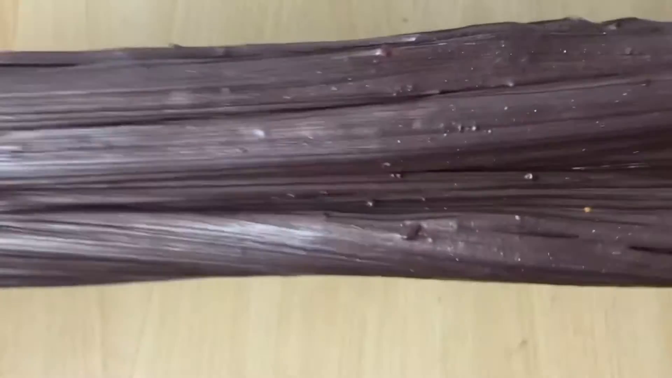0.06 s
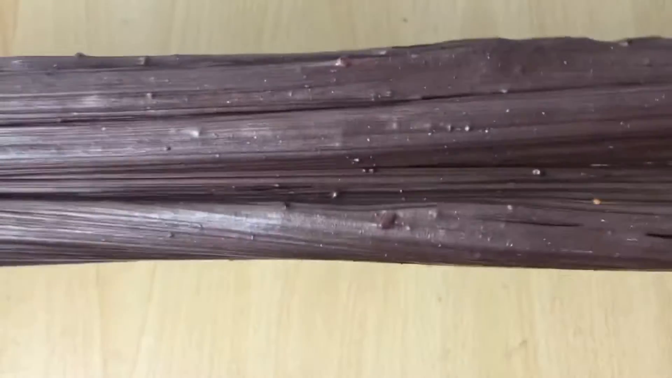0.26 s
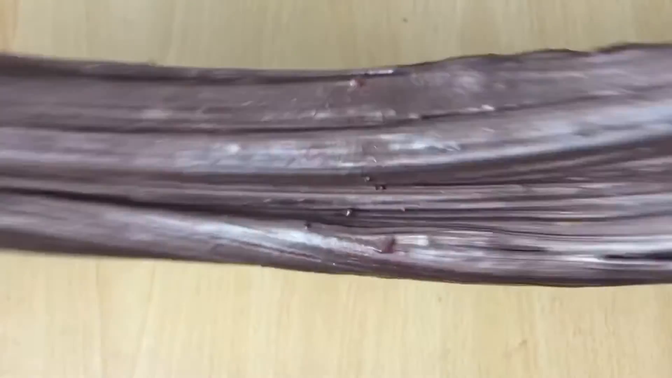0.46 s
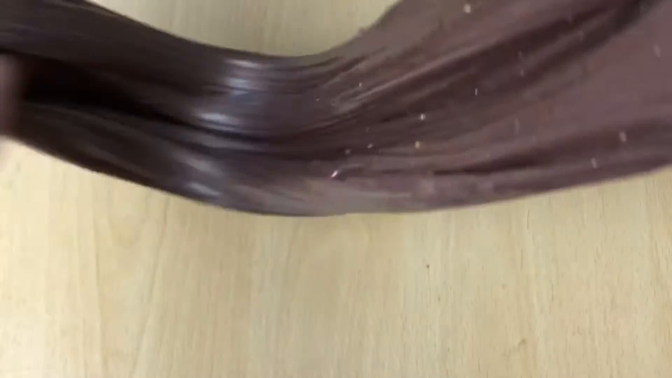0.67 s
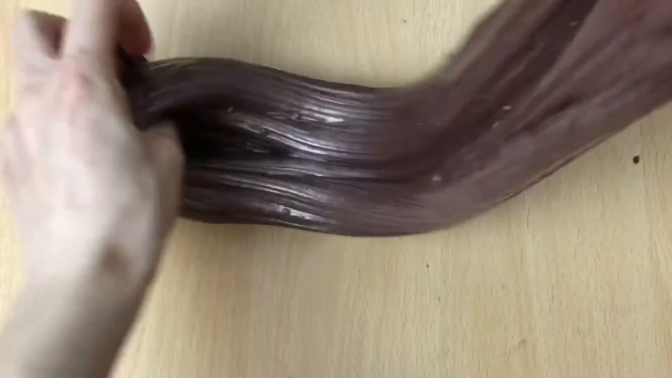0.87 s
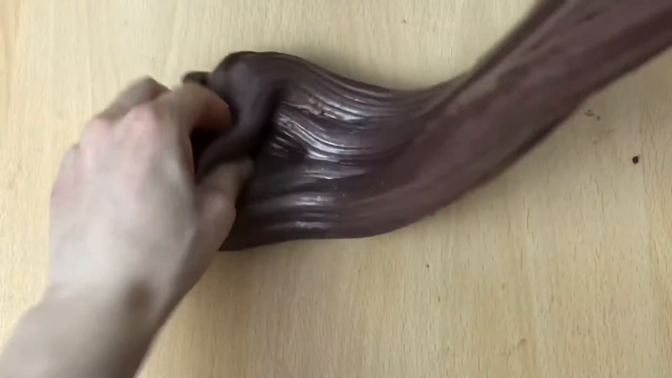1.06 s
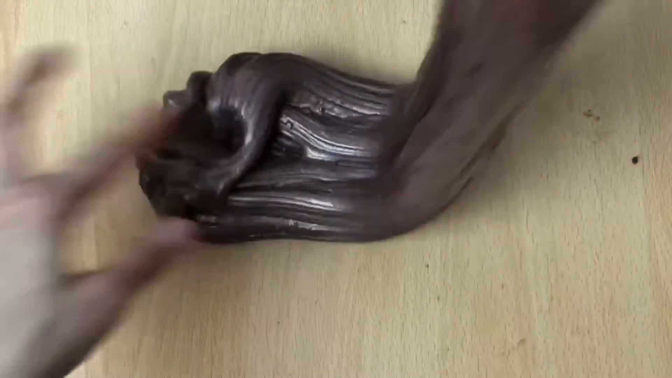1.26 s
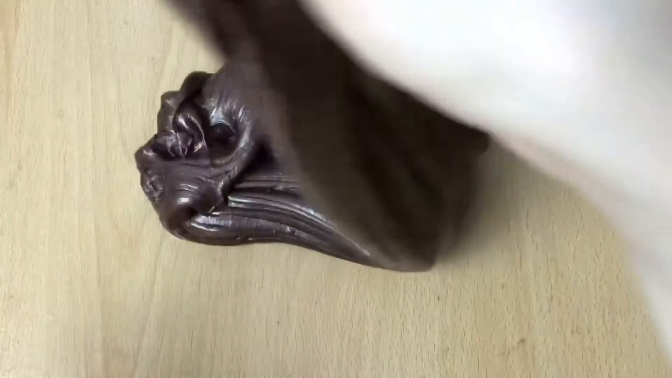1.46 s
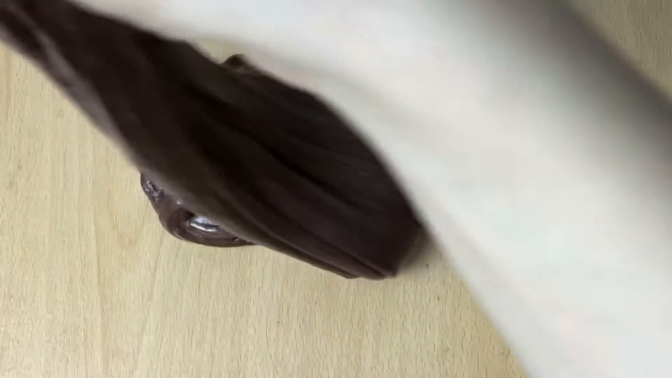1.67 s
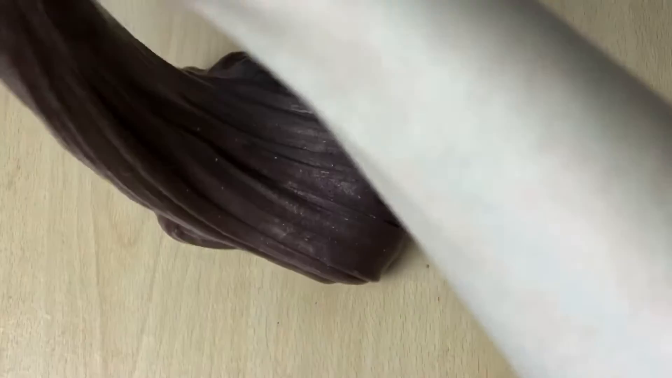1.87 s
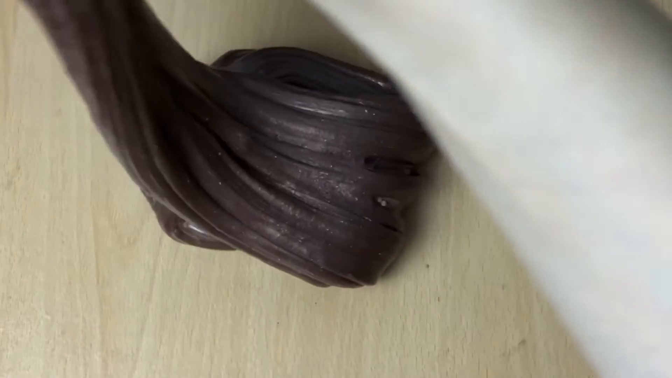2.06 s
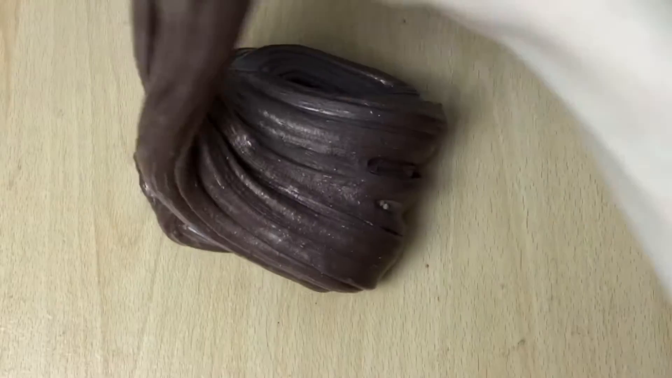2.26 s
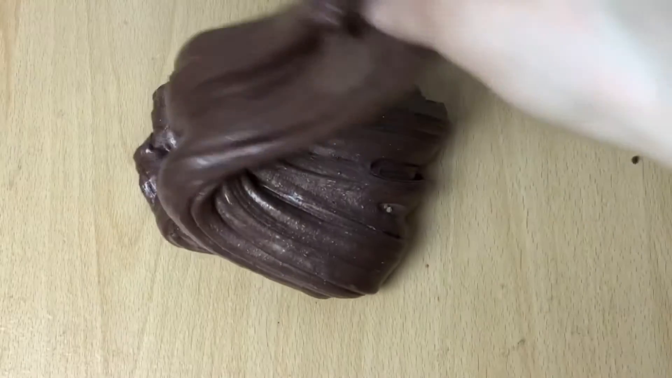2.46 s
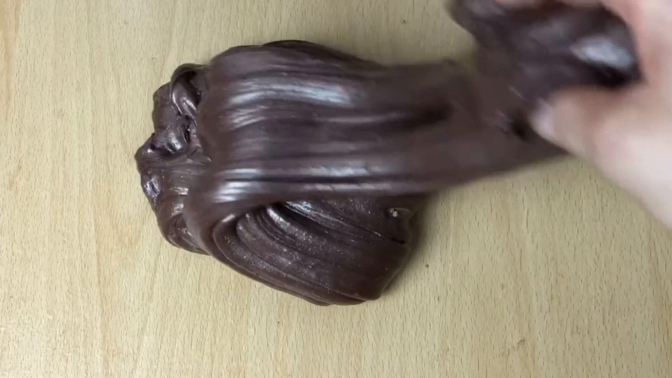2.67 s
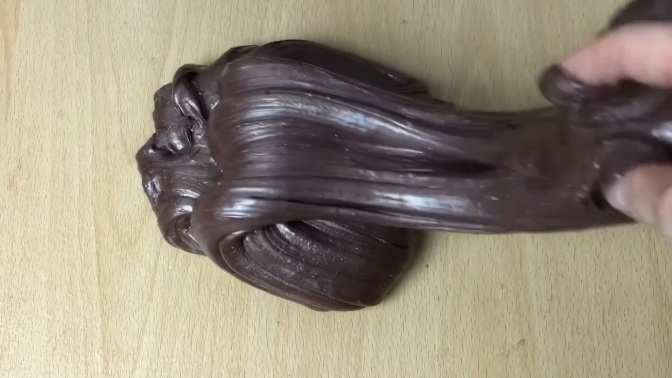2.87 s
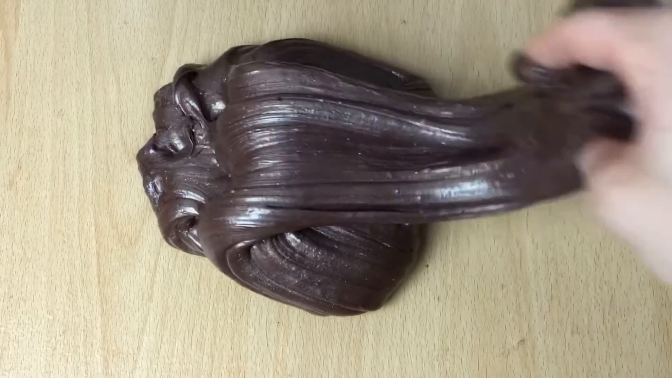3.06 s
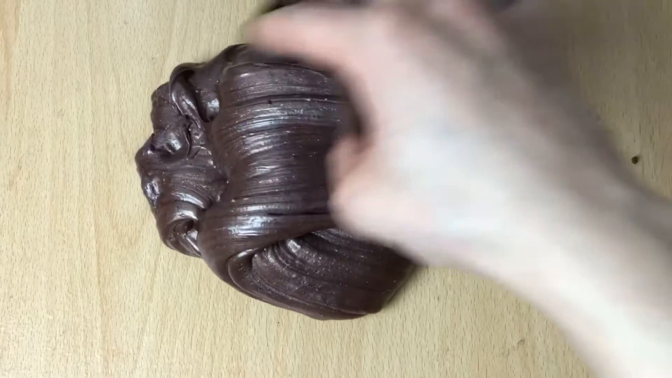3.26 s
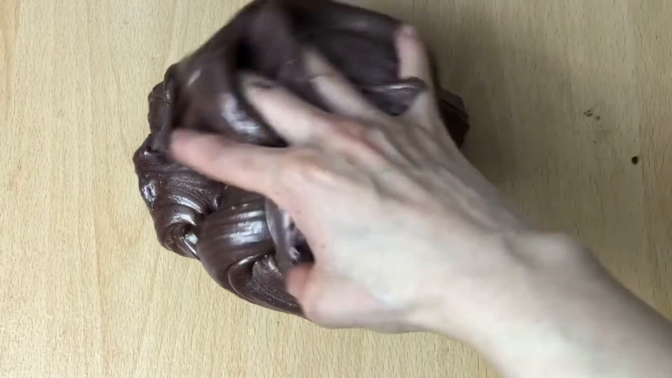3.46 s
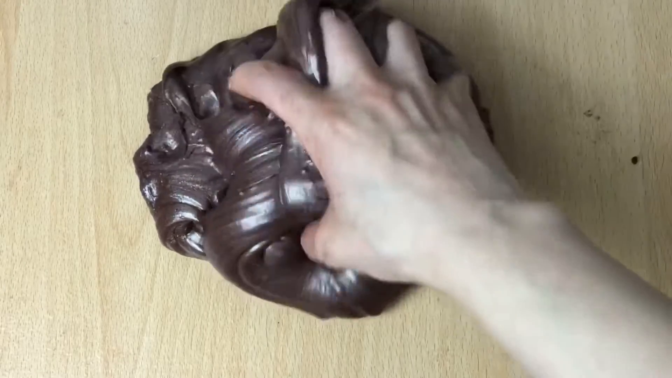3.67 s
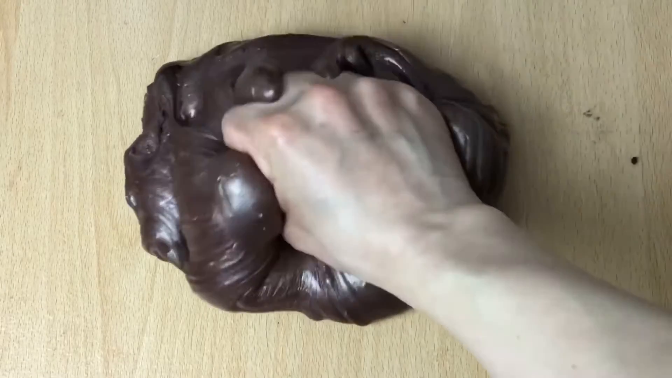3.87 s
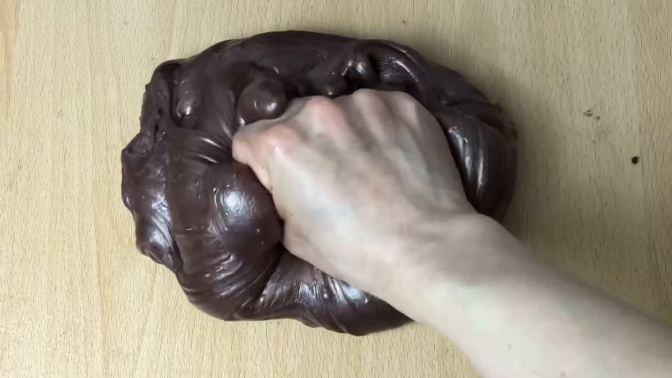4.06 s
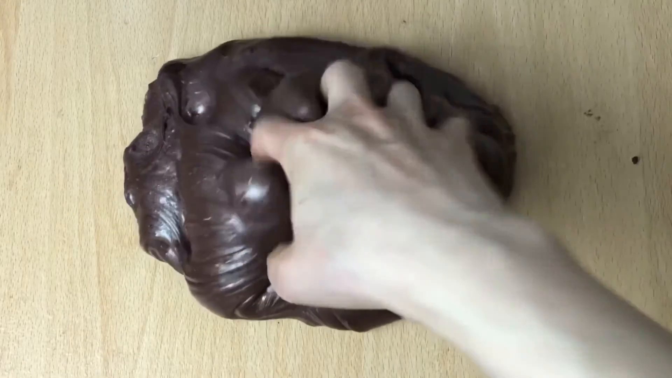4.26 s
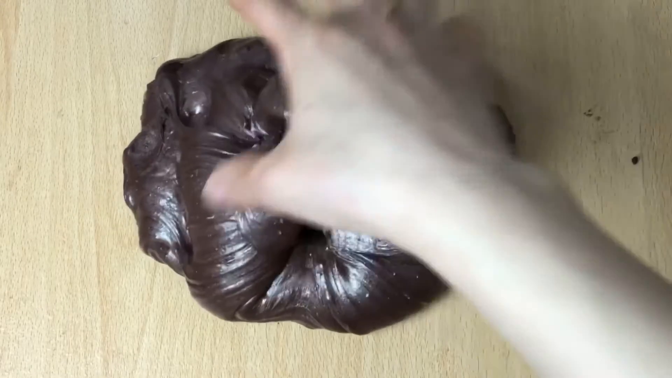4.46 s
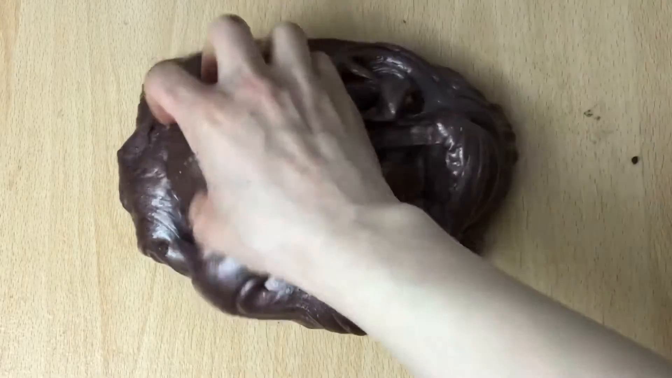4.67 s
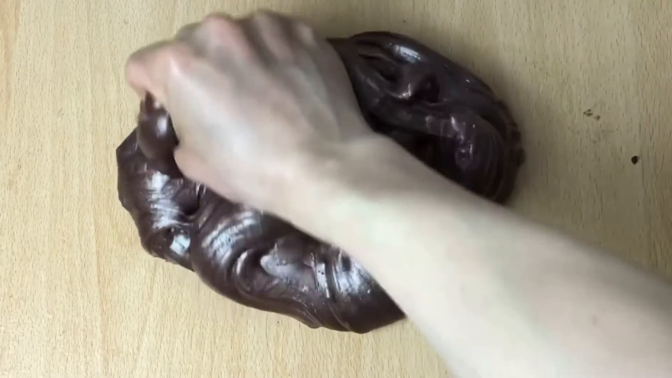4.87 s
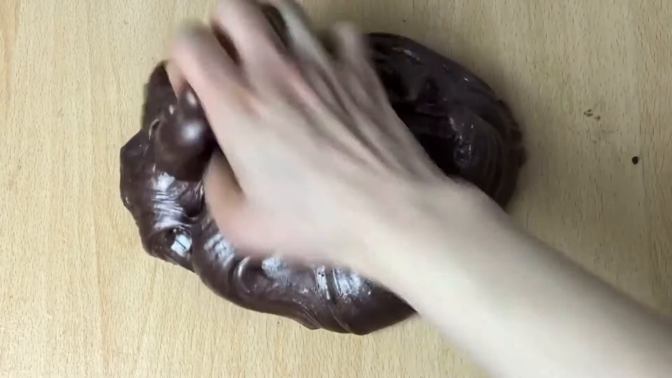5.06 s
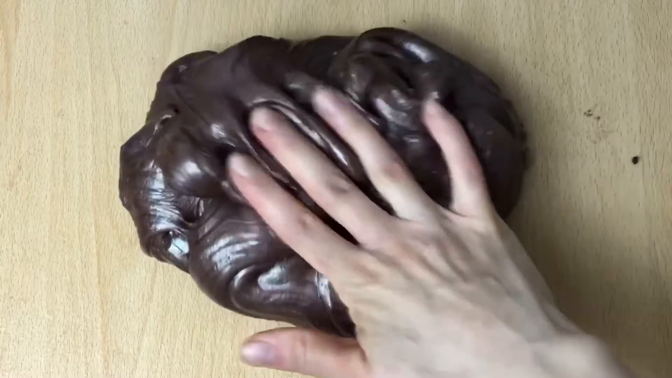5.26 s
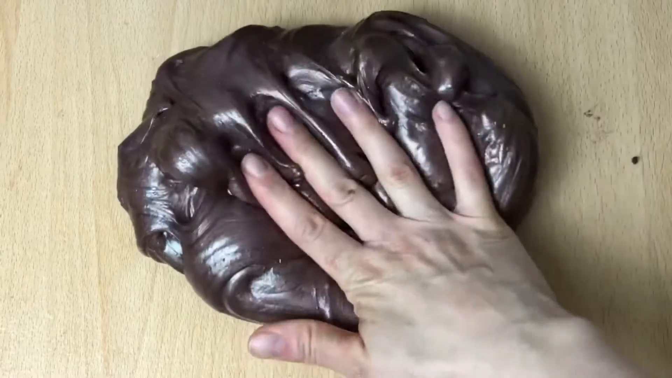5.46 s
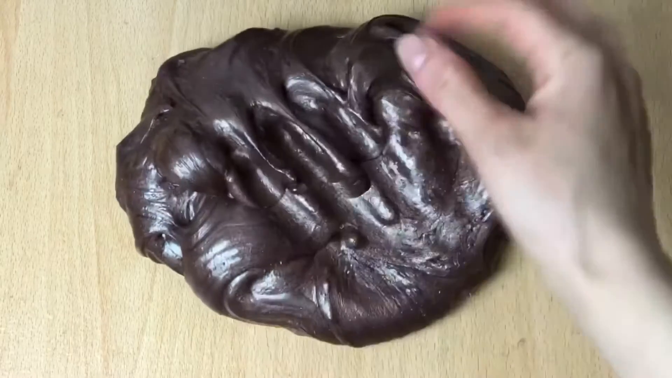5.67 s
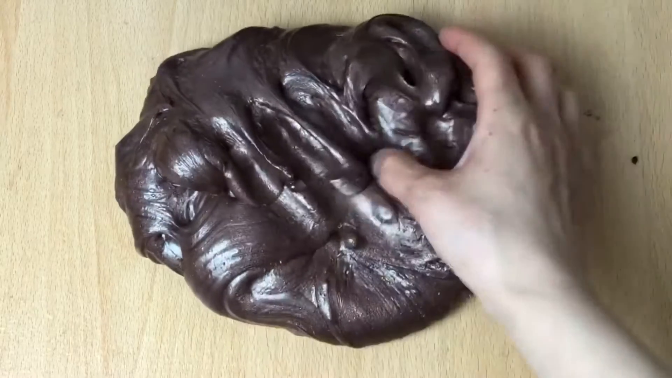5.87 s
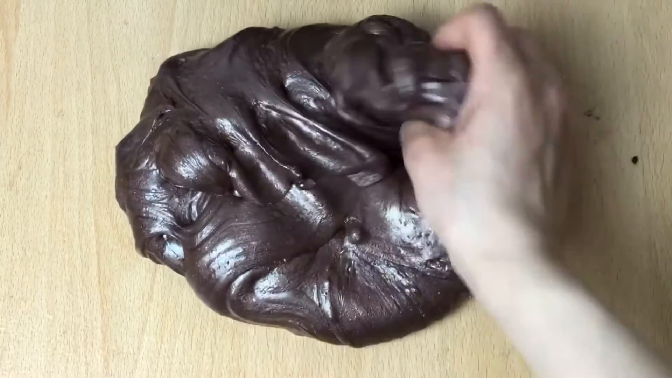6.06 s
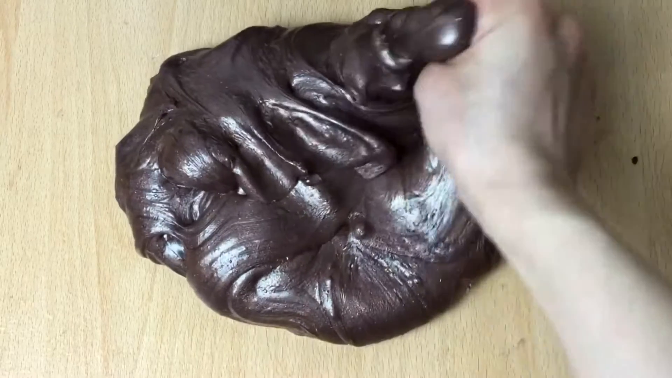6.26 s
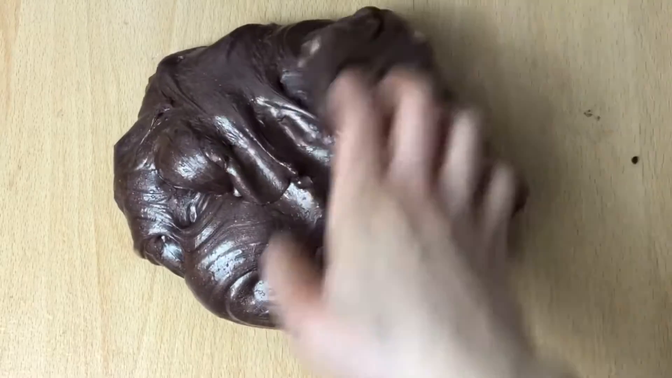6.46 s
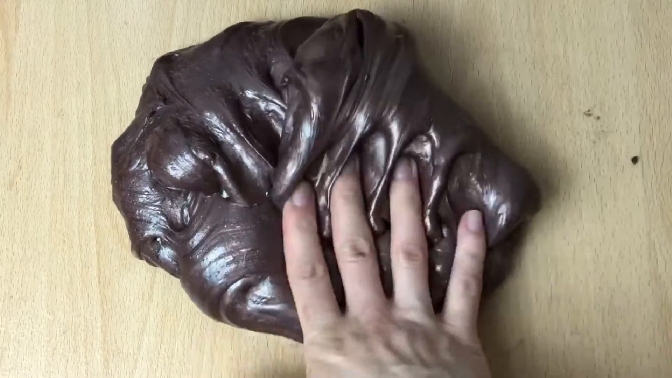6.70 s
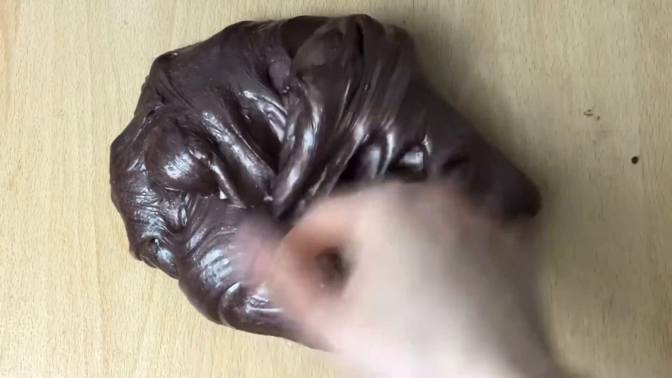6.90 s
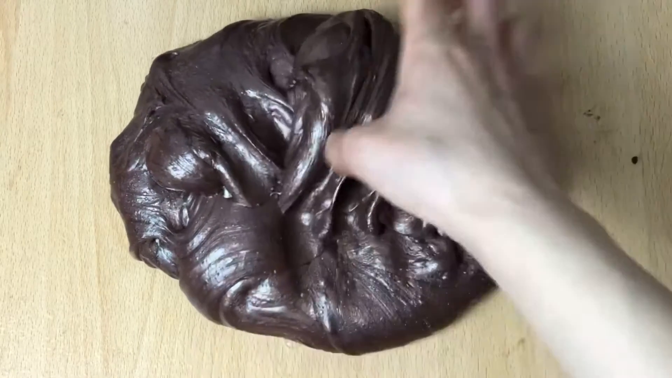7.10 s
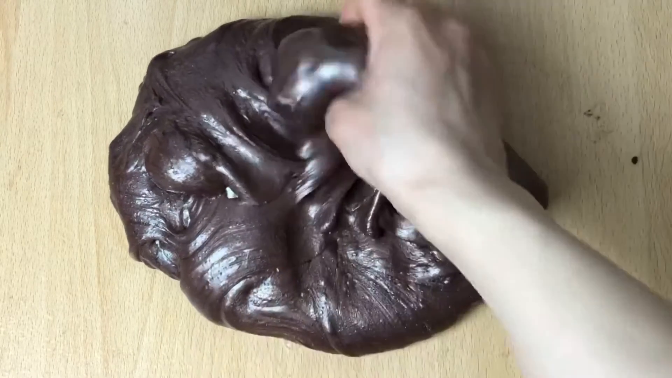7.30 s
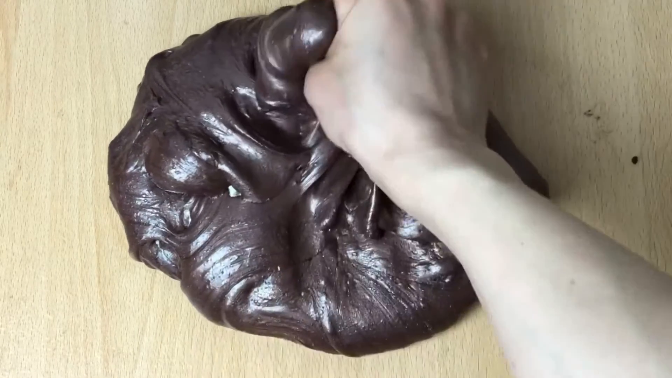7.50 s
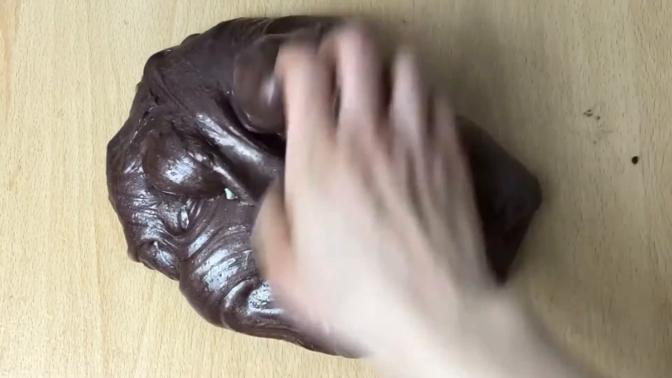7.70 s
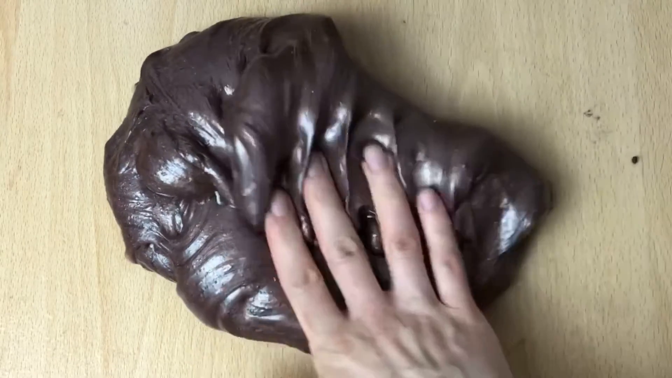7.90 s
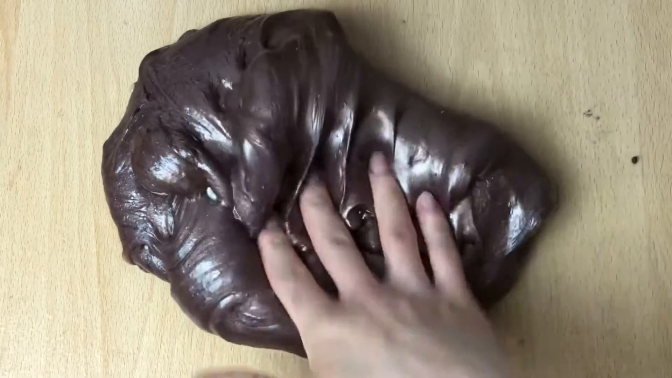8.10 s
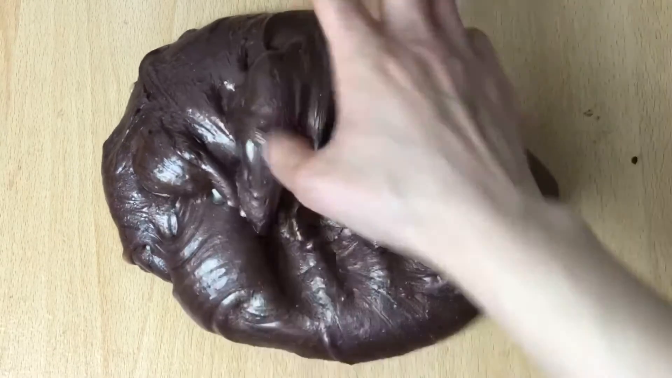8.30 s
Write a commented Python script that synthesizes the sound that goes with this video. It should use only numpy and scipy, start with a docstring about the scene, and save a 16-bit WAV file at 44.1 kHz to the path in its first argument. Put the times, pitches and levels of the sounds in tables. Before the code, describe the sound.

Quiet sticky peeling gives way to heavy squelchy presses and loud, clicking bubble pops as slime is worked on a tabletop.

```python
"""In a small room, thick slime is stretched, folded and kneaded by hand on a wooden table, close to the microphone.
Sticky films tear in a crackle of tiny dying chirps; trapped bubbles snap as filtered noise bursts.
Air squirts through wet folds as resonant flutters; pockets collapse in soft, heavily damped plops.
Low noise thuds and rumbles as the hand works, over still air, microphone hiss and a faint hum."""
import sys
import numpy as np
from scipy import signal
from scipy.fft import rfft, irfft, next_fast_len
from scipy.io import wavfile
from scipy.ndimage import uniform_filter1d

SR = 44100
rng = np.random.default_rng(int(sys.argv[2]) if len(sys.argv) > 2 else 0)


def master(y):
    """Save y as 16-bit WAV."""
    cut = np.clip(np.atleast_2d(y).T, -1, 1)
    pcm = np.round(cut * 32767)  # scale
    wavfile.write(sys.argv[1], SR, pcm.astype(np.int16))


N = 367794
TIME = np.arange(N) / SR

# Still air and microphone hiss, relative spectrum: [f/Hz, level/dB]
AIR_COLOUR = [(18, -29.5), (30, 6.5), (86, -3.5), (141, 0.5), (331, -14), (675, -20), (821, -23),
              (1510, -25), (4140, -29.5), (5980, -26), (9060, -28.5), (9760, -25.5), (10500, -46),
              (13600, -65.5), (22000, -120)]
# Ring of the room: [f/Hz, t60/s]
ROOM_DECAY = [(200, 0.17), (700, 0.2), (2500, 0.17), (6000, 0.19), (10000, 0.17)]
# Reflections off nearby surfaces: [delay/s, level before each source's trim/dB]
ECHOES = [(0.00073, -22), (.0042, -17.5), (.0071, -31.5), (0.0041, -29), (0.0119, -21)]
# Modes in which the table top rings: [f/Hz, level before trim/dB, t60/s]
TABLE_MODES = [(111, 3.5, 0.03), (189, -13.5, 0.2), (446.2, 2.5, 0.18), (629, -1, 0.033),
               (1090, -15.5, 0.3), (2830, -6, 0.06)]
# Table rumble as the arm leans on it: [t/s, level before trim/dB]
LEAN = [(0, -70), (.68, -61), (.85, -35.5), (1.04, -44.5), (1.2, -33.5), (1.68, -66.5), (2.3, -82),
        (3.3, -54), (3.8, -52.5), (4.35, -37.5), (4.95, -47.5), (5.1, -44.5), (5.85, -39), (6.2, -50),
        (6.85, -42), (7.55, -48.5), (8.2, -36.5), (8.34, -48)]

# Relative spectra of rumble, pressed mass, wet squelch and thin films: [f/Hz, level/dB]
RUMBLE_COLOUR = [(5, 2), (15, 6.5), (24, 2), (38, -5.5), (60, -5), (85, -17), (140, -26.5), (330, -48.5),
                 (900, -82)]
PRESS_COLOUR = [(60, -12.5), (105, 0.5), (135, 1.5), (200, -4), (260, -4.5), (325, -22), (440, -20.5),
                (800, -31.5), (2000, -55)]
SQUELCH_COLOUR = [(200, -23.5), (380, 2.5), (550, 4), (1000, -3.5), (1500, -0.5), (2100, -1.5), (2850, -2),
                  (3400, -5.5), (4400, -9.5), (6500, -28)]
FIZZ_COLOUR = [(2000, -4.5), (3800, -7.5), (5000, -4), (6500, -1), (8000, -4.5), (9200, -0.5), (10500, -20)]
# Filter that every snap and cavity shares: [f/Hz, gain/dB]
POP_COLOUR = [(300, 19.5), (1000, 1), (1900, -4.5), (2800, -1), (3700, 0), (5000, 2.5), (7200, 0.5),
              (9400, 3.5), (10500, -10.5)]

# The hand presses or a fold lands, levels before trim:
# [t of full force/s, rise/s, hold/s, wet squelch/dB, fizz of films/dB, thud of the mass/dB]
PRESSES = [(.77, .025, 0.036, -65, -63, -50.5), (1.08, 0.032, 0.044, -57, -56, -42.5),
           (1.175, 0.04, 0.0092, -49, -48.5, -45), (2.495, 0.011, 0.008, -55.5, -62, -47),
           (3.485, 0.11, .07, -61, -64, -57), (3.75, 0.021, 0.019, -37.5, -35, -36),
           (4.132, 0.021, .14, -42.5, -44.5, -27.5), (4.555, .015, 0.015, -70, -66, -43),
           (5.02, 0.042, 0.056, -47.5, -45.5, -38), (5.195, 0.037, .005, -53.5, -53, -47),
           (5.525, 0.054, 0.053, -54, -51, -37), (5.82, .02, 0.033, -70.5, -73.5, -49),
           (6.845, 0.081, 0.035, -56, -52.5, -37.5), (7.595, 0.047, 0.042, -46, -46, -41),
           (8.11, 0.067, 0.042, -54.5, -50.5, -32.5)]
# Slime stretches or peels off the skin, levels before trim:
# [t of full pull/s, rise/s, hold/s, wet squelch/dB, fizz of films/dB]
PULLS = [(0, .02, 0.15, -62.5, -63.5), (0.182, 0.011, 0.021, -52, -52.5), (0.327, 0.083, 0.26, -69, -61.5),
         (0.711, 0.089, .14, -65.5, -65.5), (0.922, .04, 0.11, -69, -75),
         (1.361, 0.042, 0.011, -63.5, -58.5), (1.498, .1, 0.35, -78.5, -78),
         (2.998, 0.034, 0.054, -73, -66), (3.603, 0.027, .02, -63, -58.5), (3.686, 0.051, 0.2, -60, -58.5),
         (4.626, 0.03, 0.24, -59.5, -54.5), (4.738, 0.023, 0.034, -53.5, -57.5),
         (5.114, 0.019, 0.042, -58.5, -57), (5.977, 0.06, 0.046, -58.5, -57.5),
         (6.042, 0.0085, 0.041, -43, -44), (6.095, .02, 0.056, -52.5, -48),
         (6.173, 0.013, 0.029, -54.5, -48), (6.315, 0.054, 0.021, -44, -42),
         (6.366, 0.018, .05, -58.5, -54), (6.442, 0.032, 0.056, -69.5, -60.5),
         (7.26, 0.068, 0.13, -57.5, -56), (7.295, 0.017, 0.035, -52.5, -50.5),
         (7.482, 0.055, 0.045, -70, -65.5), (7.691, .03, 0.091, -59.5, -60)]
# Largest air pockets that collapse under the hand: [t/s, level before trim/dB, f at the centre/Hz]
PLOPS = [(1.098, -42.5, 182), (2.5, -34, 168), (3.547, -43.5, 164), (3.752, -21, 610), (3.759, -21, 203),
         (3.773, -19.5, 502), (3.78, -20.5, 209), (4.139, -25, 213), (4.178, -23, 203), (4.191, -17, 195),
         (4.27, -28, 210), (4.553, -34.5, 200), (4.738, -25.5, 559), (5.086, -38.5, 145),
         (5.544, -29.5, 177), (5.588, -31, 213), (6.036, -20, 547), (6.04, -28, 235), (6.049, -26, 487),
         (6.871, -28, 200), (6.895, -30.5, 180), (8.136, -33, 173), (8.159, -27.5, 225)]
# Air squirting through a narrow wet fold: [t of peak/s, level/dB, fold f/Hz, width/Hz, length/s]
SQUIRTS = [(.075, -52, 1890, 600, 0.0025), (0.115, -53.5, 1430, 500, 0.0043), (.165, -57, 900, 400, 0.0033),
           (0.713, -63, 2200, 1100, 0.054), (0.765, -55.5, 1900, 1000, 0.02),
           (1.076, -57, 2160, 1090, 0.037), (2.866, -52.5, 890, 700, 0.0027),
           (3.8244, -35, 1680, 600, 0.0015), (3.999, -51.5, 1620, 600, 0.0028),
           (4.188, -38, 1200, 350, 0.0074), (4.692, -47.5, 3000, 700, 0.0029),
           (4.7377, -19, 2764, 260, .0011), (4.738, -20, 1010, 352, 0.0011),
           (5.054, -43.5, 2580, 900, 0.015), (5.077, -48.5, 2310, 600, 0.019),
           (6.329, -39.5, 1476, 450, 0.014), (6.331, -45.5, 2660, 500, .016),
           (6.36, -40.5, 1720, 600, 0.011), (7.265, -52, 2300, 896, 0.0068), (7.366, -54, 800, 400, .005),
           (7.738, -47.5, 4700, 500, 0.02), (7.742, -50.5, 2550, 302, 0.0066),
           (7.797, -56.5, 5320, 349, 0.023)]
# Clearest bubbles that burst, levels before POP_COLOUR: [t/s, skin snap/dB, cavity ring/dB, cavity f/Hz]
POPS = [(0.1827, -49, -42, 2090), (0.1925, -53, -48.5, 1490), (0.379, -52.5, -56, 2200),
        (.527, -55, -60, 2600), (0.8036, -48, -61, 2290), (1.109, -44, -48, 2840),
        (1.3611, -48.5, -51, 2400), (1.7, -63, -70, 2200), (1.8377, -56.5, -54.5, 2110),
        (2.2079, -60.5, -64.5, 1480), (2.2746, -69, -67, 750), (2.4678, -58, -49, 2730),
        (2.4943, -63, -51.5, 1460), (3.4812, -54, -49.5, 2040), (3.5049, -65, -46.5, 2640),
        (3.536, -54.5, -84.5, 2000), (3.5899, -55, -61, 1980), (3.7361, -57, -38, 1780),
        (3.75, -41.5, -27.5, 1200), (3.7695, -49, -32, 1270), (3.814, -43.5, -62, 1740),
        (3.8748, -44.5, -53, 2300), (3.896, -70, -52.5, 1880), (3.933, -61, -67, 2180),
        (3.954, -73, -63, 1080), (4.191, -38, -47, 1780), (4.216, -49, -41, 950), (4.2499, -50, -36, 1430),
        (4.2595, -40.5, -39, 1450), (4.535, -53, -51.5, 1720), (4.5742, -43, -43.5, 2430),
        (4.633, -46.5, -59, 2430), (4.7245, -32.5, -54, 2890), (4.7372, -22, -39, 647),
        (4.839, -55, -55, 2540), (4.8563, -46, -55, 2910), (5.0161, -55, -44, 2560),
        (5.1255, -41, -43.5, 1420), (5.8148, -68, -59.5, 1585), (5.9629, -55.5, -49.5, 2260),
        (6.033, -35, -31, 1810), (6.0352, -28, -22.5, 1750), (6.039, -28, -52.5, 1940),
        (6.0497, -21, -55.5, 1680), (6.1377, -54, -40.5, 2090), (6.1706, -31.5, -35.5, 1950),
        (6.3272, -59, -33, 1540), (6.544, -64, -60.5, 2180), (6.579, -70, -61, 1780),
        (7.1915, -56, -62.5, 1820), (7.26, -57, -53, 2400), (7.296, -36.5, -49, 2410),
        (7.298, -40, -47, 2090), (7.3766, -49.5, -50, 2210), (7.4917, -32, -46.5, 2500),
        (7.5555, -48.5, -62, 2610)]

EDGE_HZ = 10450
AIR_DB = -63.5
CRACKLE_RELEASE_S, THUD_RELEASE_S, BOARD_RELEASE_S = 0.041, 0.064, 0.6  # fall by 20 dB once the hand stops
CREEP_DB, SETTLE_DB = -81, -67  # slime left to itself still ticks (before trim) and sags
SNAP_HZ, SNAP_HZ_PER_DB = 7300, 26  # pitch of a -40 dB snap; a tauter skin snaps louder and higher
# Faint bubbles that burst by themselves; the spread is to either side, levels before POP_COLOUR
STRAY_PER_S, STRAY_DB, STRAY_SPREAD_DB, STRAY_HZ = 4.4, -73.5, 2.5, 2007


def gain_of(db):
    """Decibels to amplitude."""
    return 10 ** (np.asarray(db) / 20)


def evened(x):
    """Scales to an rms of one."""
    return x / np.sqrt(np.mean(x ** 2) + 1e-20)


def read(points, hz):
    """Reads a table on a log-frequency axis."""
    f, value = np.transpose(points)
    return np.interp(np.log(hz + 1), np.log(f + 1), value)


def level(rows):
    """Turns a curve of dB into a gain for every sample."""
    return gain_of(np.interp(TIME, *np.transpose(rows)))


def shaped(x, colour):
    """Filters a long signal by a table of gains."""
    size = next_fast_len(N)
    hz = np.fft.rfftfreq(size, 1 / SR)
    spectrum = rfft(x, size) * gain_of(read(colour, hz))
    return irfft(spectrum, size)[:N]


def coloured(x, colour):
    """Gives a long signal a spectrum, at an rms of one."""
    return evened(shaped(x, colour))


def add(mix, s, sound):
    """Lays a sound into the mix at s seconds, cut off at the end of the mix."""
    part = mix[max(round(s * SR), 0):][:len(sound)]
    part += sound[:len(part)]


def band(x, hz, spread):
    """A damped resonance from hz / spread to hz * spread, at least about a tenth of its pitch wide."""
    spread = max(spread, 1.05)
    edges = [hz / spread, min(hz * spread, SR / 2 - 100)]
    sections = signal.butter(2, edges, "band", fs=SR, output="sos")
    return signal.sosfilt(sections, x)


def rip(noise, swell):
    """A brief random burst under the envelope swell that holds all frequencies about equally."""
    for _ in range(2):
        z = rfft(noise * swell)
        noise = irfft(z / (abs(z) + 1e-12), len(noise))  # flatten the spectrum, keep the phases
    return noise * np.sqrt(swell)


def murk(colour, size):
    """Low noise of a heavy soft mass, at an even strength over size samples."""
    x = coloured(rng.standard_normal(N), colour)
    power = uniform_filter1d(uniform_filter1d(x ** 2, size=size), size=size)
    return x / np.sqrt(np.abs(power) + 1e-9)


def strokes(rows, release_s, order):
    """Each move of the hand swells, holds and lets go; order picks the dB column that sets its strength."""
    power = np.zeros(N)
    for row in rows:
        s, rise_s, hold_s = row[:3]
        before = np.maximum(s - TIME, 0) / rise_s
        after = np.maximum(TIME - s - hold_s, 0) / release_s
        below = before + after  # in steps of 20 dB
        near = below < 4
        power[near] += gain_of(row[order] - 20 * below[near]) ** 2
    return np.sqrt(power)


def room_tone(hum_hz=136, hum_db=-65):
    """Still air, microphone hiss and the faint wavering hum of a distant appliance: narrow-band noise."""
    air = coloured(rng.standard_normal(N), AIR_COLOUR)
    hum = evened(band(rng.standard_normal(N), hum_hz, 1))
    return gain_of(AIR_DB) * air + gain_of(hum_db) * hum


def room(x, tail_db, echo_db, gap_s=0.00076):
    """Adds a few near echoes and a short dense noise tail that decays at its own rate in each band."""
    t = TIME[:SR // 2]
    hz, at, z = signal.stft(rng.standard_normal(len(t)), SR, nperseg=256)
    decay = gain_of(-60 * at / read(ROOM_DECAY, hz)[:, None])
    tail = signal.istft(z * decay, SR, nperseg=256)[1][:len(t)]
    tail = tail * (1 - np.exp(-(t / gap_s) ** 2))  # a soft gap after the direct sound
    response = gain_of(tail_db) * tail / np.linalg.norm(tail)
    for delay, db in ECHOES:
        add(response, delay, gain_of([db + echo_db]))
    return x + signal.fftconvolve(x, response)[:N]


def table_ring(x):
    """Whatever happens in the slime also shakes the board it sticks to: a sum of decaying modes."""
    t = TIME[:SR // 2]
    response = np.zeros(len(t))
    for hz, db, t60 in TABLE_MODES:
        decay = np.log(1000) / t60
        mode = np.exp(-decay * t) * np.cos(2 * np.pi * hz * t)
        response += gain_of(db) * 2 * decay / SR * mode  # unit gain at resonance before db
    return signal.fftconvolve(x, response)[:N]


def rumble(lean_db=-2, push_db=-6):
    """The table rumbles under the leaning arm, and more with every press."""
    lean = gain_of(lean_db) * level(LEAN)
    push = gain_of(push_db) * strokes(PRESSES, BOARD_RELEASE_S, order=5)
    return murk(RUMBLE_COLOUR, size=6000) * np.hypot(lean, push)


def shifting(press_db=-2.5, drag_db=-6):
    """The mass thuds under each press, is dragged along by each pull, and sags in between."""
    thud = gain_of(press_db) * strokes(PRESSES, THUD_RELEASE_S, order=5)
    drag = gain_of(drag_db) * strokes(PULLS, THUD_RELEASE_S, order=3)
    strength = np.sqrt(thud ** 2 + drag ** 2 + gain_of(SETTLE_DB) ** 2)
    return murk(PRESS_COLOUR, size=1500) * strength


def plops(rise_cycles=0.64, fall_cycles=0.65, glide=0.12, plop_db=-1.5):
    """A collapsing pocket gives two or three heavily damped swings, rising in pitch as it shrinks."""
    out = np.zeros(N)
    t = np.arange(-.03, .03, 1 / SR)
    for s, db, hz in PLOPS:
        cycles = hz * t
        width = np.where(cycles < 0, rise_cycles, fall_cycles)
        swell = np.exp(-(cycles / width) ** 2 / 2)
        swing = np.sin(2 * np.pi * (cycles + glide * cycles ** 2 / 2))
        add(out, s + t[0], np.sqrt(2) * gain_of(db + plop_db) * swell * swing)
    return out


def squirts():
    """A short flutter of air swells and fades in the resonance of a fold."""
    out = np.zeros(N)
    t = np.arange(-.07, .07, 1 / SR)
    hz = np.fft.rfftfreq(len(t), 1 / SR)
    airs = rng.standard_normal((len(SQUIRTS), len(t)))
    for (s, db, fold_hz, width_hz, length), air in zip(SQUIRTS, airs):
        swell = np.exp(-2 * (t / length) ** 2)
        detune = (hz ** 2 - fold_hz ** 2) / (hz + 1) / width_hz
        resonance = 1 / (1 + 1j * detune / 2) ** 2
        puff = irfft(rfft(rip(air, swell)) * resonance, len(t))
        loudness = np.linalg.norm(swell) / np.linalg.norm(puff)
        add(out, s + t[0], gain_of(db) * puff * loudness)
    return out


def grains(low_hz, high_hz, per_s, cycles, size_db, count=28):
    """Countless tiny bubbles of count pitches: each a short dying chirp, most faint and a few stronger."""
    out, t = np.zeros(N), TIME[:400]
    used = int(per_s * N / SR / count)
    for hz in np.geomspace(low_hz, high_hz, count):
        places, sizes = rng.random((2, used))
        strength = np.minimum(-np.log(1 - sizes), 4.5)
        clicks = np.bincount((places * N).astype(int), gain_of(size_db * strength), N)
        chirp = np.exp(-hz * t / cycles) * np.sin(2 * np.pi * hz * t * (1 + 10 * t))
        out += rng.choice([-1, 1]) * signal.oaconvolve(clicks, chirp * hz)[:N]
    return out


def crackle(squelch_db=-1, fizz_db=-2.5, clump_db=3.0):
    """Skin peels off slime and folds close, in uneven slips: larger bubbles squelch, thin films fizz."""
    wet = coloured(grains(433, 4870, per_s=1700, cycles=3.94, size_db=3.0), SQUELCH_COLOUR)
    fine = coloured(grains(3000, 10500, per_s=2900, cycles=6.5, size_db=0.5), FIZZ_COLOUR)
    unevenness = evened(uniform_filter1d(rng.standard_normal(N), size=260))
    slips = evened(gain_of(clump_db * unevenness))
    moves, creep = PRESSES + PULLS, gain_of(CREEP_DB)
    wet_strength = np.hypot(strokes(moves, CRACKLE_RELEASE_S, order=3), creep)
    fine_strength = np.hypot(strokes(moves, CRACKLE_RELEASE_S, order=4), creep)
    squelch = gain_of(squelch_db) * wet * wet_strength
    fizz = gain_of(fizz_db) * fine * fine_strength
    return slips * (squelch + fizz)


def stray_pops():
    """Faint bubbles at random moments, as rows like those of POPS, within half an octave of STRAY_HZ."""
    rows = []
    for when, skin, hollow, pitch in rng.random((int(STRAY_PER_S * N / SR), 4)):
        skin_db = STRAY_DB + STRAY_SPREAD_DB * (2 * skin - 1)
        hollow_db = STRAY_DB + STRAY_SPREAD_DB * (2 * hollow - 1)
        rows.append((when * N / SR, skin_db, hollow_db, STRAY_HZ * 2 ** (pitch - .5)))
    return rows


def pops(tear_s=0.0005, ring_s=0.00064, snap_spread=1.36, cavity_spread=1.62, lead_s=.0004):
    """A bubble's skin rips within about two milliseconds with a bright snap; the opened cavity rings briefly."""
    out, bubbles = np.zeros(N), POPS + stray_pops()
    t, span = TIME[:1024], .004 * SR
    noises = rng.standard_normal((len(bubbles), 2, len(t)))
    for (s, skin_db, hollow_db, hollow_hz), noise in zip(bubbles, noises):
        skin_hz = SNAP_HZ + SNAP_HZ_PER_DB * (skin_db + 40)
        snap = band(rip(noise[0], t * np.exp(-t / tear_s)), skin_hz, snap_spread)
        ring = band(rip(noise[1], t * np.exp(-t / ring_s)), hollow_hz, cavity_spread)
        pop = gain_of(skin_db) * evened(snap) + gain_of(hollow_db) * evened(ring)
        add(out, s - lead_s, pop * np.sqrt(span / len(t)))  # levels refer to a span of 4 ms
    return shaped(out, POP_COLOUR)


def scene(ring_db=-2):
    """Mixes slime, table and room into one channel."""
    snaps = pops()
    sticky = crackle() + squirts()
    pockets = plops()
    slime = room(snaps, tail_db=-6.5, echo_db=6)
    slime += room(sticky, tail_db=-6.0, echo_db=-7)
    slime += room(pockets, tail_db=-5.0, echo_db=-1.5)
    board = gain_of(ring_db) * table_ring(snaps + sticky + pockets)
    return (room_tone() + rumble() + shifting() + board + slime)[None]


def record(dry):
    """The recorder's band limit: a low-pass at EDGE_HZ."""
    taps = signal.firwin(121, EDGE_HZ, window=("kaiser", 8), fs=SR)
    return signal.oaconvolve(dry, taps[None], "same", axes=1)


dry = scene()
out = record(dry)
master(out)
```